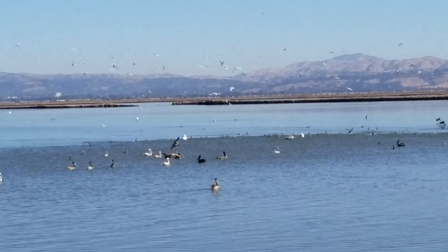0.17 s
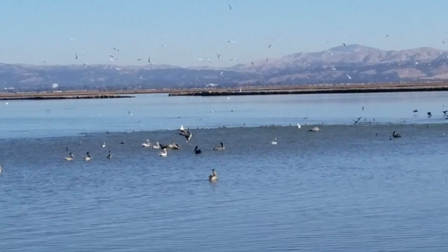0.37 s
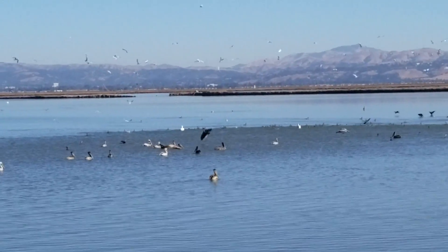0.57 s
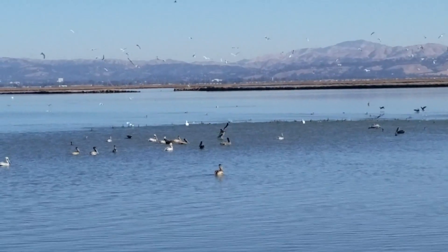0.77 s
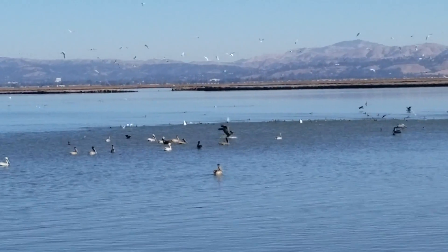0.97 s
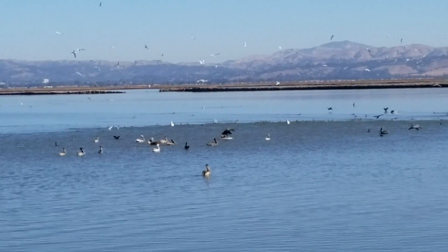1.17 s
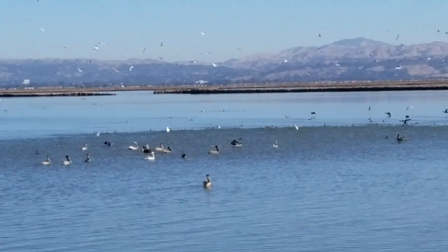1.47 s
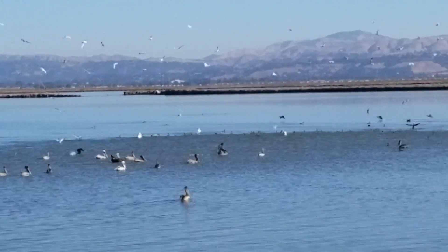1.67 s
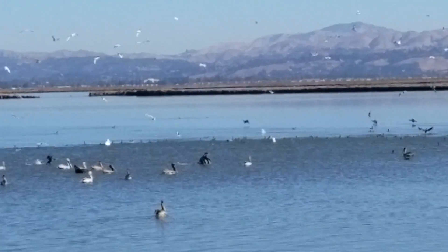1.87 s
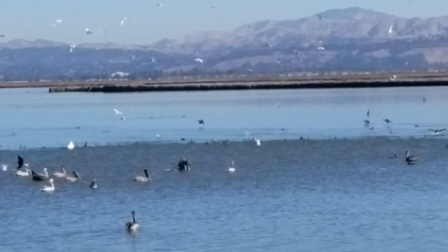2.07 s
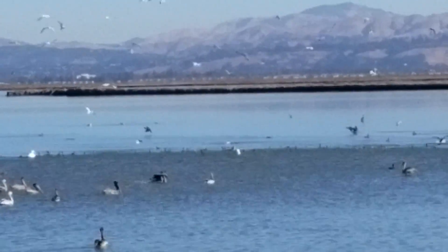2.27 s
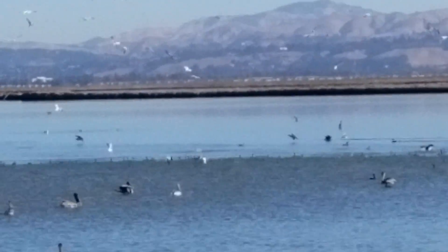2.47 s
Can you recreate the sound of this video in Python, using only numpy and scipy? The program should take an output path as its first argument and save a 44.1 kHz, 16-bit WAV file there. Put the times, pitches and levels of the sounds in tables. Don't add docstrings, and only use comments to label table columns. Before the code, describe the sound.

A flock of gulls, terns and waders calls in quick overlapping whistles, peeps, chatter and dry rattles over open water; soft wind rumble and faint engine hum beneath, one loud knock on the handheld recorder midway.

```python
import sys
import numpy as np
from scipy import signal
from scipy.fft import rfft, irfft, next_fast_len
from scipy.io import wavfile
from scipy.ndimage import uniform_filter1d, map_coordinates

SR = 44100
rng = np.random.default_rng(int(sys.argv[2]) if len(sys.argv) > 2 else 0)


def ratio_of_db(decibels):
    return 10 ** (np.asarray(decibels, float) / 20)


def materialize(psi):
    bounded = np.clip(np.atleast_2d(psi).T, -1, 1)
    quanta = np.round(bounded * 32767).astype(np.int16)
    wavfile.write(sys.argv[1], SR, quanta)


N = 115101


def unit(x):
    return x / np.sqrt(np.mean(x ** 2) + 1e-20)


def along(points, hz):
    f, v = np.transpose(points)
    return np.interp(np.log(hz + 1), np.log(f + 1), v)


def wobble(knots_per_s, size=N):
    knots = rng.standard_normal(int(size * knots_per_s / SR) + 4)
    return map_coordinates(knots, [np.arange(size) * knots_per_s / SR])


def filtered(x, response):
    m = next_fast_len(N + 8192)
    return irfft(rfft(x, m) * response(np.fft.rfftfreq(m, 1 / SR)), m)[..., :N]


def arch(rise, drop, top=0.3):
    def bend(u, length):
        before = rise * ((top - u) / top) ** 2
        after = drop * ((u - top) / (1 - top)) ** 2
        return 1 - np.where(u < top, before, after)
    return bend


def settling(depth, time_s):
    return lambda u, length: 1 - depth * (1 - np.exp(-u * length / time_s))


def sing(rows, bend, overtones, edge_s, flutter_db, rasp):
    spread_db = 2
    out = np.zeros((2, N + SR))
    for s, length, hz, db in rows:
        side = ratio_of_db(rng.normal(0, spread_db) / 2 * np.array([[1], [-1]]))
        u = np.linspace(0, 1, round(length * SR))

        def unsteady(knots_per_s):
            return wobble(knots_per_s, size=SR // 8)[:len(u)]

        pitch = hz * bend(u, length) * (1 + 0.0068 * unsteady(149))
        phase = 2 * np.pi * np.cumsum(pitch) / SR
        from_edge_s = np.minimum(u, 1 - u) * length
        envelope = np.sin(np.pi / 2 * np.clip(from_edge_s / edge_s, 0, 1)) ** 2
        voice = sum(ratio_of_db(g + rng.normal(0, 1.7) * (g < 0)) * np.sin(k * phase) for k, g in overtones)
        voice = voice * (1 + rasp * unsteady(1700))
        level = ratio_of_db(db + 2 + flutter_db * unsteady(133))
        out[:, round(s * SR):][:, :len(u)] += side * level * envelope * voice
    return out[:, :N]


def bouts(rows, sounding, sag, fade_db):
    return [(s + k * gap, sounding * gap, hz * (1 - sag * k), db - fade_db * k * k)
            for s, count, gap, hz, db in rows for k in range(round(count))]


PURE = [(1, -1.5), (2, -35)]
CLEAR = [(1, -1.0), (2, -21.0)]

# start in seconds, length in seconds, top pitch in Hz, level in dB rms.
ARCHED_WHISTLES = [
    (.2151, 0.111, 4125, -58),
    (0.3566, 0.059, 4720, -43),
    (1.0331, 0.043, 4360, -54.5),
    (1.4451, 0.065, 4510, -48),
    (1.0361, 0.041, 3345, -59),
    (1.4551, 0.053, 3540, -56.5),
    (1.6781, 0.069, 4610, -47),
    (1.6671, 0.11, 3575, -58.5),
    (2.4451, 0.053, 5830, -65.5),
    (1.2, 0.039, 5300, -61.5),
]
# start in seconds, length in seconds, top pitch in Hz, level in dB rms.
FLAT_WHISTLES = [
    (.745, .112, 4630, -44.5),
    (.773, 0.027, 3290, -44.5),
    (1.157, 0.031, 3170, -46.5),
    (1.283, 0.039, 3160, -43),
    (1.362, 0.034, 4480, -56),
    (1.47, 0.019, 3120, -51),
    (1.893, 0.046, 3410, -54),
    (1.945, 0.069, 4730, -51.5),
    (2.279, 0.0666, 4450, -51),
    (2.361, 0.085, 4560, -57.5),
]


def whistlers():
    arched = sing(ARCHED_WHISTLES, arch(0.0545, 0.109, top=0.51), PURE, 0.0097, 0.8, rasp=0.13)
    flat = sing(FLAT_WHISTLES, arch(0.047, 0.051, top=0.44), PURE, 0.009, 2.1, rasp=0.066)
    return arched + flat


# start in seconds, length in seconds, start pitch in Hz, level in dB rms.
FALLING_PEEPS = [(0.01, 0.022, 4500, -50.5), (0.129, 0.026, 4380, -56.5), (0.484, 0.038, 3630, -48.5),
                 (1.235, 0.027, 3220, -42), (1.269, 0.015, 4360, -45), (1.321, 0.022, 4270, -42),
                 (1.903, 0.021, 5540, -55), (2.012, 0.034, 4280, -44), (2.108, 0.034, 4565, -42),
                 (2.26, 0.022, 4300, -51.5), (2.392, 0.016, 3860, -42.5)]
# start in seconds, length in seconds, start pitch in Hz, level in dB rms.
RISING_PEEPS = [
    (0.322, 0.0089, 2330, -41),
    (0.467, 0.025, 1360, -55),
    (1.091, 0.03, 3000, -46.5),
    (1.194, 0.019, 3050, -48),
    (1.338, 0.016, 3080, -42),
    (1.353, 0.021, 2945, -45.5),
    (1.749, 0.019, 1295, -57),
    (2.069, 0.018, 4150, -53),
    (2.105, 0.019, 3100, -41),
    (2.242, 0.018, 2980, -42.5),
]
# start in seconds, length in seconds, start pitch in Hz, level in dB rms.
DIVING_PEEP = [
    (1.138, 0.028, 5680, -39),
]
# start in seconds, pitch in Hz, level in dB rms.
SINGLE_PIPS = [(.547, 3280, -50), (.562, 3310, -53), (.577, 3970, -51), (0.864, 1957, -45),
               (1.132, 7930, -59), (1.236, 4560, -46), (1.512, 4000, -54), (1.522, 3950, -57),
               (1.846, 5150, -56), (1.859, 4000, -43.5), (1.8885, 4030, -43), (1.901, 4160, -60),
               (1.918, 4060, -43), (1.947, 5420, -58), (1.96, 5440, -61), (2.1627, 4640, -48),
               (2.368, 3650, -52), (1.751, 3200, -57), (2.139, 5030, -54), (2.186, 3800, -48),
               (2.21, 5100, -59), (2.238, 5100, -59), (2.268, 2810, -42), (2.272, 1880, -47),
               (2.312, 1910, -44), (2.343, 3470, -49), (2.35, 3066, -42)]


def peepers():
    rise = lambda u, length: 1 + 3.25 * u * length
    pip_s = 0.011
    pips = [(s, pip_s, hz, db) for s, hz, db in SINGLE_PIPS]
    return (sing(FALLING_PEEPS, settling(0.1235, 0.0265), CLEAR, 0.0062, 1.0, rasp=0.22)
            + sing(RISING_PEEPS, rise, CLEAR, 0.0039, 1.4, rasp=0.054)
            + sing(DIVING_PEEP, settling(0.27, 0.0065), CLEAR, 0.011, 2.6, rasp=0.24)
            + sing(pips, arch(0.0067, 0.03), CLEAR, 0.0035, 1.0, rasp=0.4))


# start in seconds, length in seconds, top pitch in Hz, level in dB rms.
SAGGING_YELP = [
    (2.369, .037, 2798, -40),
]
WIDE_SWOOP = [
    (1.84, 0.075, 6350, -57),
]
PIPING_CALL = [
    (.284, 0.094, 4900, -58.5),
]
REEDY_MEW = [
    (.593, .057, 2673, -60.5),
]


def lone_callers():
    return (sing(SAGGING_YELP, arch(0.028, 0.12, top=0.33), CLEAR, 0.0042, 1.1, rasp=0.11)
            + sing(WIDE_SWOOP, arch(0.11, 0.37, top=0.27), CLEAR, 0.016, 2.6, rasp=0.25)
            + sing(PIPING_CALL, arch(0.055, 0.071), [(1, -3.4), (2, 0.78)], 0.013, 1.0, rasp=0)
            + sing(REEDY_MEW, arch(0, 0.16, top=0.025), [(1, 2.5), (2, 2.5), (3, -13)], 0.011, 1.4, rasp=0.057))


# start in seconds, notes, spacing in seconds, first pitch in Hz, level in dB rms.
CHATTER_BOUTS = [(0.312, 1, 0.0061, 2210, -56), (0.366, 1, 0.018, 2440, -41), (0.399, 2, 0.013, 2410, -41),
                 (0.433, 1, 0.015, 2210, -50), (.449, 1, 0.013, 2340, -40), (.462, 1, 0.015, 2470, -42.5),
                 (0.475, 2, 0.014, 2460, -51), (0.513, 1, 0.05, 2282, -43.5), (.559, 2, 0.014, 2240, -51.5),
                 (.692, 3, 0.018, 2310, -60), (1.738, 1, 0.013, 2320, -48.5), (1.786, 1, 0.02, 2400, -44),
                 (1.819, 2, 0.013, 2180, -44), (1.854, 2, 0.017, 2307, -43.5), (1.887, 1, 0.013, 2200, -53),
                 (1.931, 2, 0.013, 2300, -44), (1.957, 4, 0.013, 2163, -48)]


def chatterers():
    notes = bouts(CHATTER_BOUTS, 0.79, 0.023, 0.92)
    halved = [(0.5, -24.0), (1, 1), (1.5, -22), (2, -13), (3, -27.5)]
    return sing(notes, arch(0.038, 0.081), halved, 0.0038, 2.3, rasp=0.14)


# start in seconds, syllables, spacing in seconds, first pitch in Hz, level in dB rms.
RATTLE_BOUTS = [(0.3254, 1, 0.038, 1330, -60.5), (0.7546, 1, 0.016, 1416, -50.5),
                (0.8067, 1, 0.016, 1383, -49), (0.8211, 1, 0.014, 1236, -50.5),
                (.8441, 1, 0.018, 1182, -49.5), (0.8846, 2, .017, 1255, -51.5),
                (.9401, 1, 0.026, 1258, -51), (.9681, 1, 0.01, 1150, -61), (1.2586, 3, 0.014, 1635, -48),
                (1.3915, 4, 0.012, 1590, -52), (1.57, 1, .014, 1295, -53), (1.5847, 2, 0.015, 1417, -49.5),
                (1.617, 1, .014, 1247, -56), (2.0503, 3, 0.015, 1515, -51.5)]
# frequency in Hz, gain in dB.
GULL_THROAT = [
    (1200, -11),
    (2400, 1),
    (4200, 3),
    (5150, 2),
    (5900, -14),
    (7000, -9),
    (9000, -28),
]


def rattlers():
    syllables = bouts(RATTLE_BOUTS, 0.79, 0.011, 0.2)
    reedy = list(enumerate([-0.5, 1, 1, -2.5, -0.5, -2, -2], 1))
    buzz = sing(syllables, arch(0.074, 0.015, top=0.77), reedy, 0.0056, 2.45, rasp=0.35)
    return filtered(buzz, lambda hz: ratio_of_db(along(GULL_THROAT, hz)))


# start in seconds, syllables, spacing in seconds, first pitch in Hz, level in dB rms.
SCOLD_BOUTS = [
    (2.14, 1, 0.012, 1518, -45.5),
    (2.152, 1, 0.028, 1465, -50),
    (2.185, 2, .014, 1454, -44.5),
    (2.212, 1, 0.018, 1458, -44.5),
    (2.228, 1, 0.014, 1343, -42),
]


def scolder():
    syllables = bouts(SCOLD_BOUTS, 0.94, 0.0053, 0.3)
    harsh = list(enumerate([-15.5, 1.0, -3, -20, -28, -18], 1))
    return sing(syllables, arch(0.0093, 0.066, top=0.21), harsh, 0.0037, 1.7, rasp=0.25)


def babble(count=500):
    babble_db = -62.5
    d = rng.random((count, 4))
    near = np.array([row[0] for row in CHATTER_BOUTS + RATTLE_BOUTS + SCOLD_BOUTS + FALLING_PEEPS + RISING_PEEPS])
    leader = (d[:, 0] * len(near)).astype(int)
    start = np.abs(near[leader] + 0.05 * rng.standard_normal(count))
    length = 0.004 + 0.007 * d[:, 1] ** 2
    hz = 1300 + 3800 * d[:, 2] ** 0.6
    db = babble_db + 9 * (d[:, 3] - 0.5)
    return sing(np.c_[start, length, hz, db], arch(0.099, 0.015), [(0.99, 1.9)], 0.0028, 0.96, rasp=0.23)


# frequency in Hz, left over right in dB.
LEFT_PORT_COLOUR = [
    (2000, -3.5),
    (2600, 5.5),
    (3100, -10),
    (4400, -17),
    (5100, -8),
    (6300, -1.5),
    (8500, -5),
]


def shore(birds):
    t = np.arange(SR // 8) / SR
    tail = rng.standard_normal((2, len(t))) * ratio_of_db(-60 * t / 0.095)
    tail = tail / np.linalg.norm(tail[0])
    wet = birds + ratio_of_db(-10.5) * signal.fftconvolve(birds, tail, axes=1)[:, :N]

    def ports(hz):
        left = ratio_of_db(along(LEFT_PORT_COLOUR, hz))
        two_samples_late = np.exp(-4j * np.pi * hz / SR)
        return np.array([left * two_samples_late, np.ones_like(hz)]) * np.sqrt(2 / (1 + left ** 2))
    return filtered(wet, ports)


def knock():
    knock_s, knock_db, low_cut_hz, press_s = 1.2276, -0.5, 106, 0.00012
    step = ratio_of_db(knock_db) * np.clip((np.arange(N) / SR - knock_s) / press_s, 0, 1)

    def low_cut(hz):
        s = 1j * hz / low_cut_hz
        drain = s / (s + 0.96) * s * s / (s * s + 1.58 * s + 1)
        return drain / (2j * np.pi * (hz + 1e-3) / SR)
    thump = filtered(np.gradient(step), low_cut)
    ring = filtered(np.gradient(np.sign(step)), lambda hz: 1j * np.clip(hz / 4000 - 2, 0, 1))
    return np.array([thump + ratio_of_db(-5) * ring, np.zeros(N)])


# start in seconds, peak level in dB.
PORT_TICKS = [
    (.3515, -46),
    (0.9953, -49),
    (2.5535, -51),
    (2.605, -51),
]


def touches():
    out = np.zeros((2, N))
    t = np.arange(SR // 400) / SR
    for s, db in PORT_TICKS:
        out[1, round(s * SR):][:len(t)] += ratio_of_db(db - 60 * t / 0.0055) * rng.standard_normal(len(t))
    stroke = np.exp(-((np.arange(N) / SR - 0.222) / 0.035) ** 2)
    brush = stroke * rng.standard_normal(N)
    out[1] += ratio_of_db(-57.5) * filtered(brush, lambda hz: (hz > 2500) * (hz < 13000))
    return out


def rush(spectrum, alike, patchy_db):
    z = signal.stft(rng.standard_normal((2, N)), nperseg=512)[2]
    field = uniform_filter1d(uniform_filter1d(rng.standard_normal(z.shape[1:]), 6, 0), 10, 1)
    pair = signal.istft(z * ratio_of_db(patchy_db * unit(field)), nperseg=512)[1][:, :N]

    def mid_and_side(hz):
        turn = np.arccos(np.clip(along(alike, hz), -1, 1)) / 2
        band = np.clip(hz / 60, 0, 1) ** 2 * (hz < 15800)
        return band * ratio_of_db(along(spectrum, hz)) * [np.cos(turn), np.sin(turn)]
    mid, side = filtered(pair, mid_and_side)
    return unit(np.array([mid + side, mid - side]))


BASS_LEAN = ratio_of_db([[-1.2], [1.2]])

# frequency in Hz, density in dB per Hz.
WIND_SPECTRUM = [
    (15, -55),
    (25, -3.5),
    (130, 5.5),
    (344, -9),
    (377, -8.5),
    (743, -20),
    (2000, -30),
    (2600, -29),
    (4400, -120),
]
# frequency in Hz, left-right likeness from 0 to 1.
WIND_LIKENESS = [
    (100, 1),
    (300, 0.75),
    (1400, 0.59),
]


def wind():
    gusts = ratio_of_db(-45 + 0.89 * wobble(3.06))
    return BASS_LEAN * gusts * rush(WIND_SPECTRUM + [(3000, -120)], WIND_LIKENESS, patchy_db=1.0)


# multiple of the firing rate, level in dB rms.
ENGINE_HUM = [
    (2, -66),
    (4, -59),
    (5, -65),
    (6, -59.5),
]


def engine():
    firing_hz = 63.15
    turn = 2 * np.pi * np.cumsum(firing_hz * (1 + 0.002 * wobble(2.5))) / SR
    nearing_db = np.linspace(-1.5, 7, N)
    hum = sum(ratio_of_db(db + nearing_db + 1.84 * wobble(5.92)) * np.sin(k * turn) for k, db in ENGINE_HUM)
    return BASS_LEAN * hum


# frequency in Hz, gain in dB.
AIR_SPECTRUM = [
    (1000, 1),
    (2000, -5.5),
    (4700, -15.5),
    (5600, -19.5),
    (9000, -26),
    (12000, -23.5),
    (15800, -19.5),
]


def air():
    hiss = ratio_of_db(-56.5) * rush(AIR_SPECTRUM, [(1400, 0.49), (6000, 0.03)], patchy_db=1.0)
    return filtered(hiss, lambda hz: ratio_of_db(0.19 * along(LEFT_PORT_COLOUR, hz) * np.array([[1], [-1]])))


def scene():
    near = whistlers() + peepers() + lone_callers() + chatterers() + rattlers() + scolder()
    return shore(near + babble()) + knock() + touches() + wind() + engine() + air()


def band_limit(x):
    return signal.sosfilt(signal.butter(12, 17030, fs=SR, output="sos"), x)


def record(dry):
    return band_limit(dry)


dry = scene()
out = record(dry)
materialize(out)
```